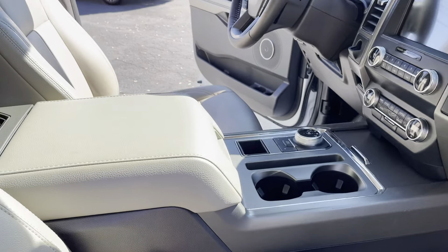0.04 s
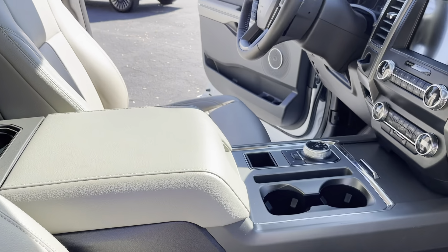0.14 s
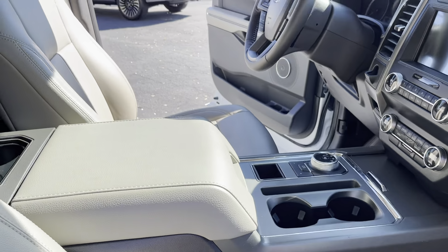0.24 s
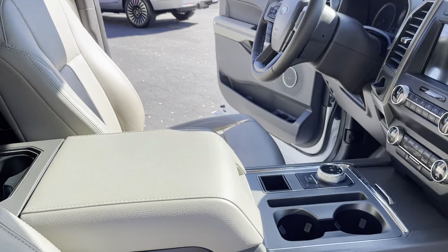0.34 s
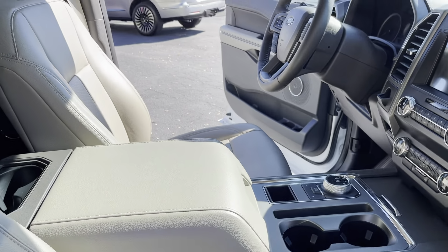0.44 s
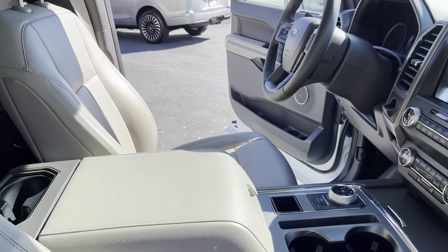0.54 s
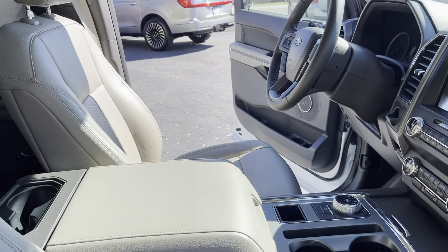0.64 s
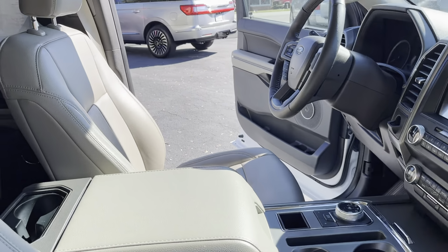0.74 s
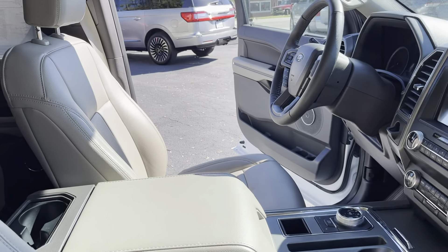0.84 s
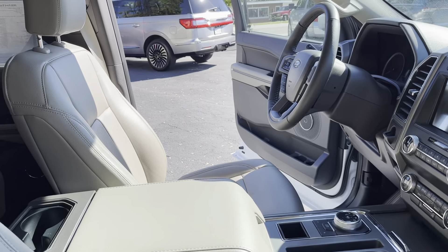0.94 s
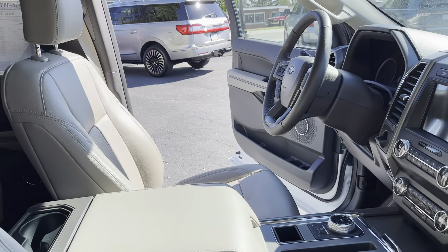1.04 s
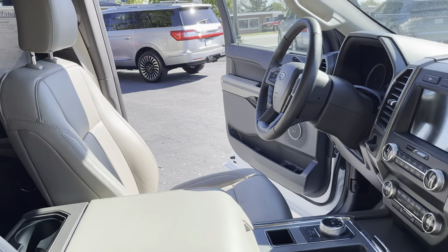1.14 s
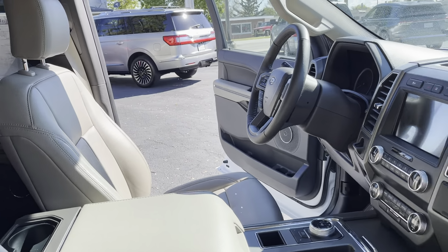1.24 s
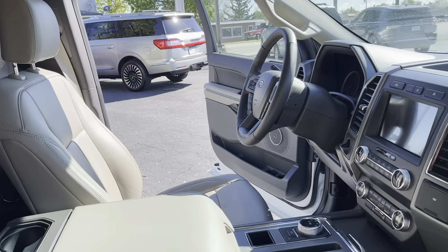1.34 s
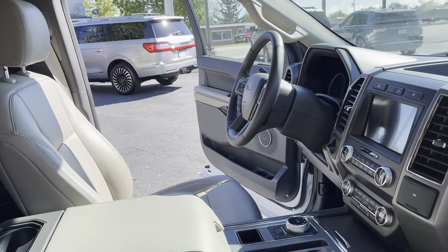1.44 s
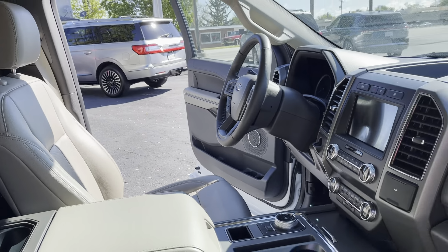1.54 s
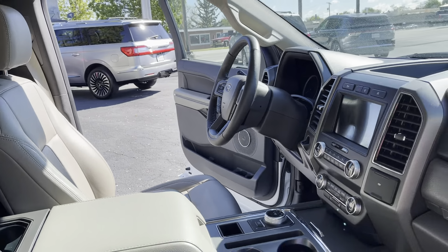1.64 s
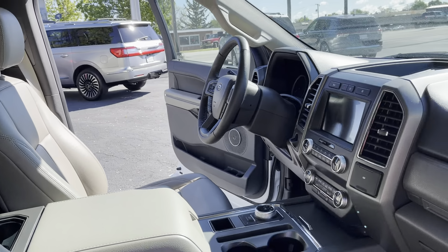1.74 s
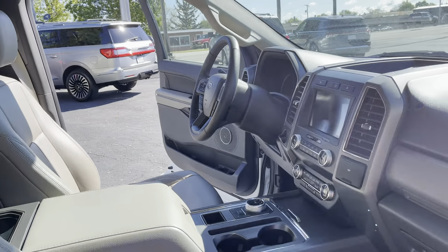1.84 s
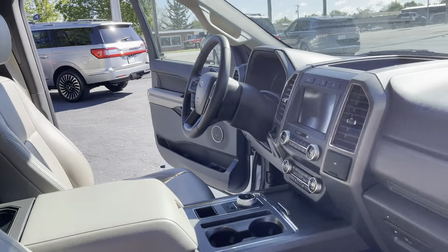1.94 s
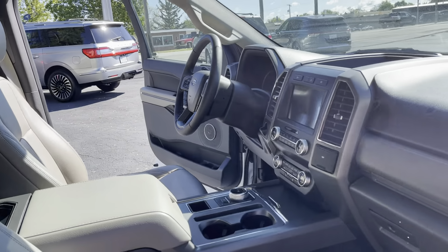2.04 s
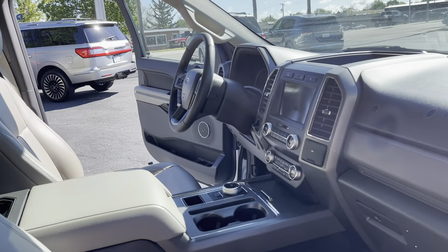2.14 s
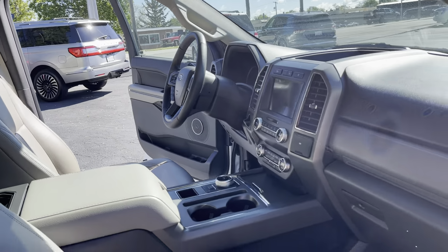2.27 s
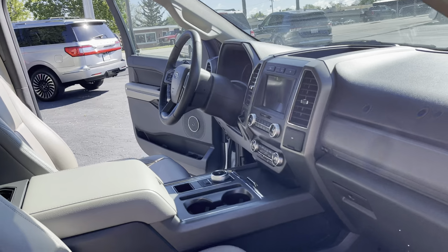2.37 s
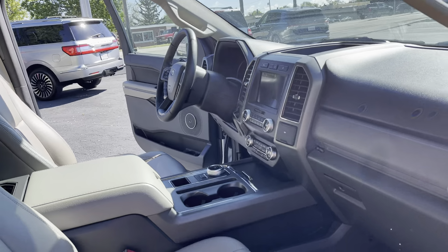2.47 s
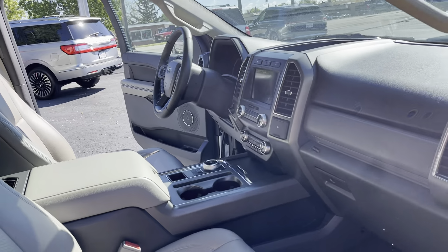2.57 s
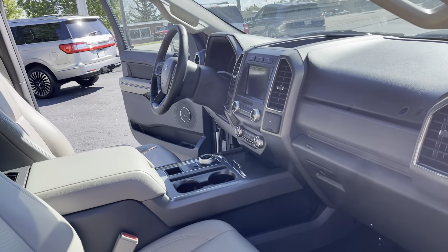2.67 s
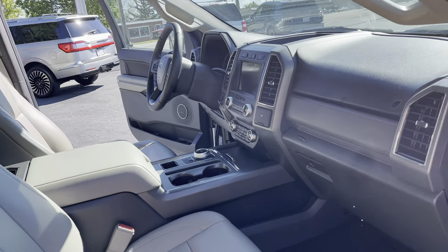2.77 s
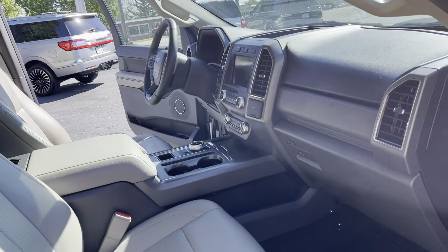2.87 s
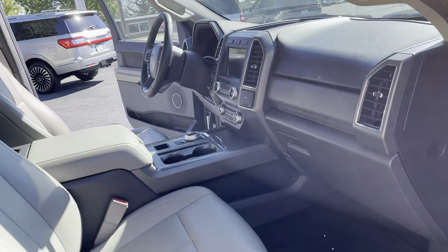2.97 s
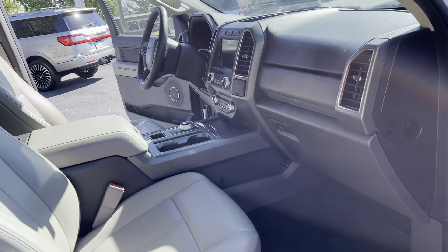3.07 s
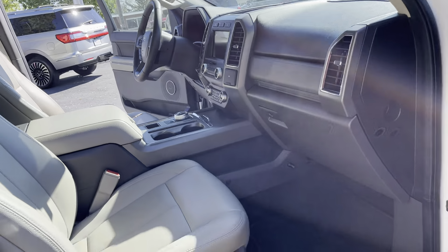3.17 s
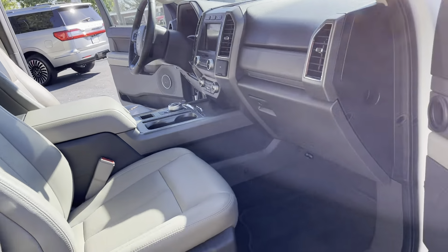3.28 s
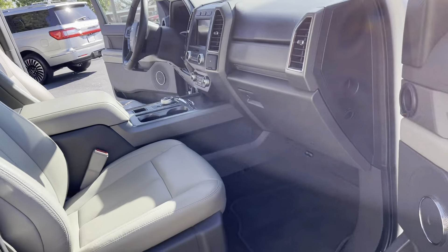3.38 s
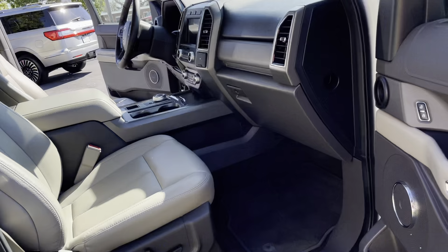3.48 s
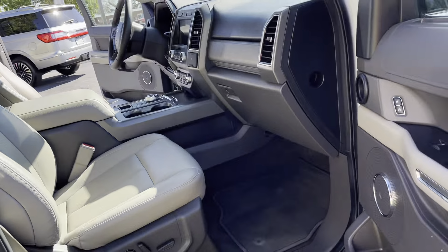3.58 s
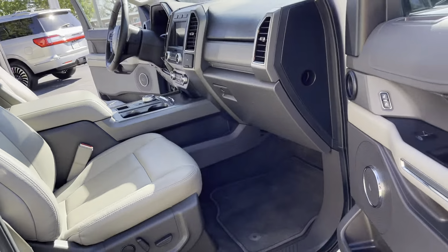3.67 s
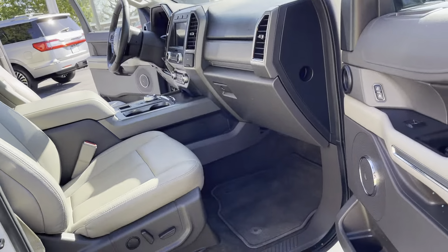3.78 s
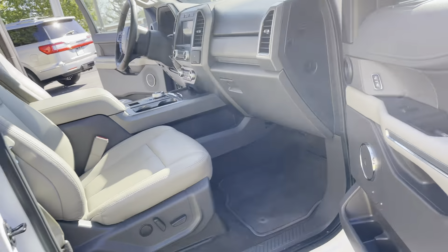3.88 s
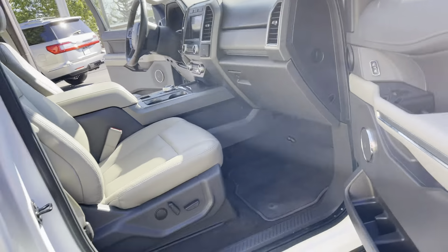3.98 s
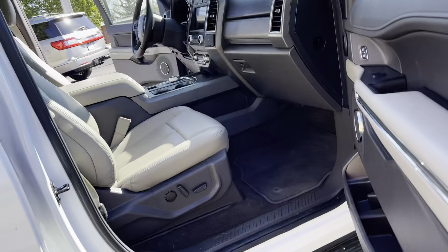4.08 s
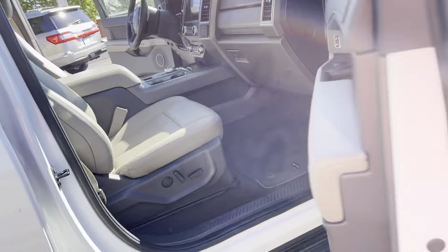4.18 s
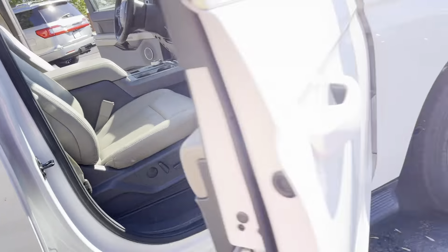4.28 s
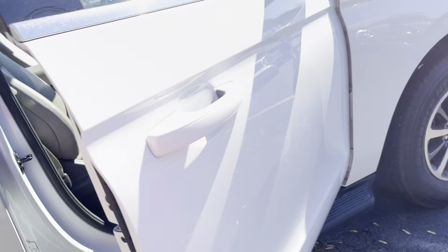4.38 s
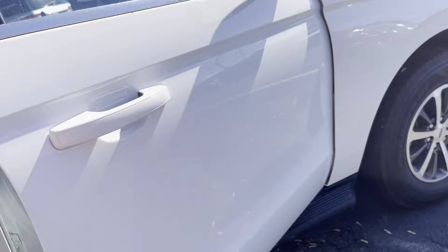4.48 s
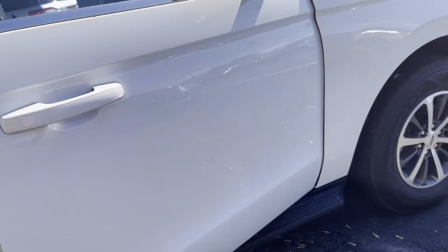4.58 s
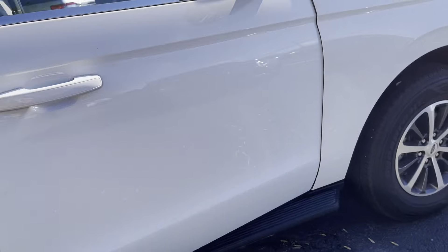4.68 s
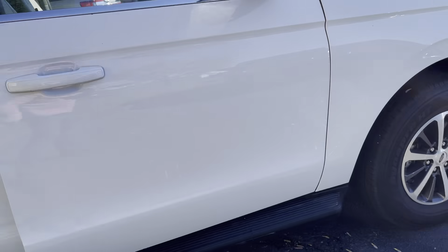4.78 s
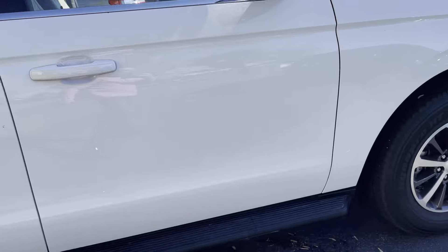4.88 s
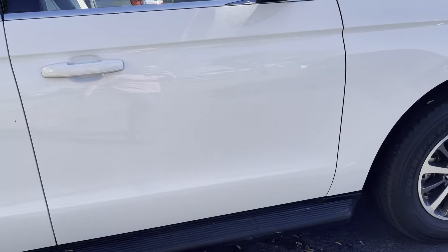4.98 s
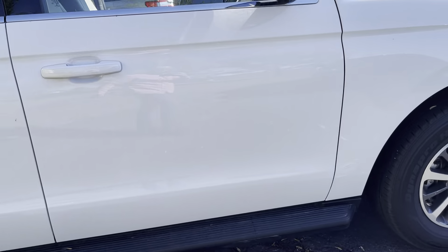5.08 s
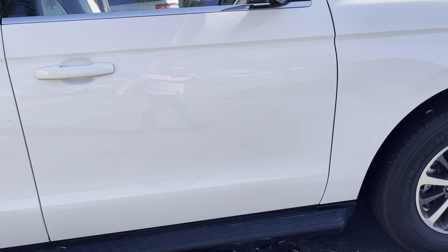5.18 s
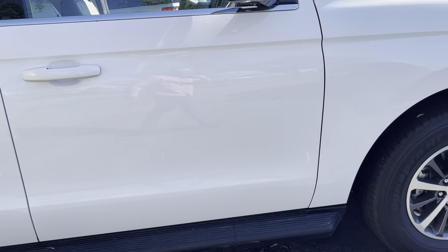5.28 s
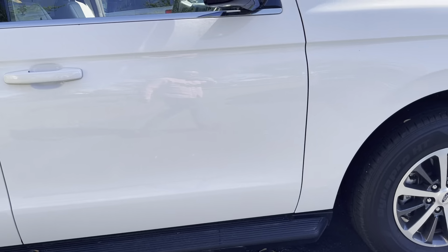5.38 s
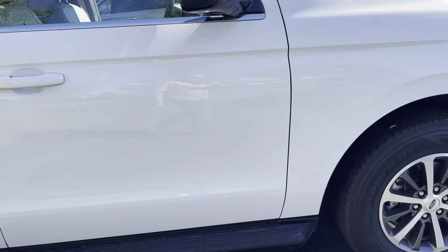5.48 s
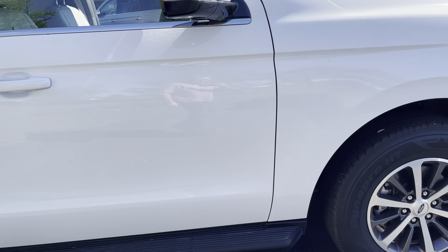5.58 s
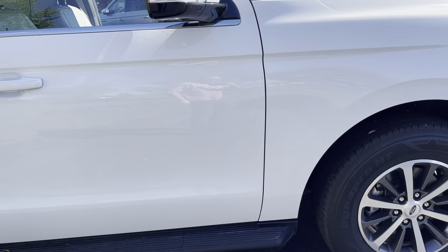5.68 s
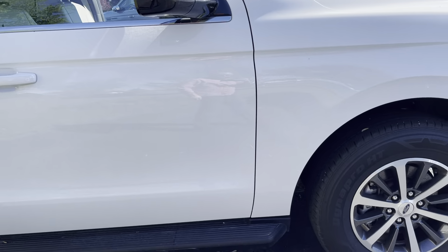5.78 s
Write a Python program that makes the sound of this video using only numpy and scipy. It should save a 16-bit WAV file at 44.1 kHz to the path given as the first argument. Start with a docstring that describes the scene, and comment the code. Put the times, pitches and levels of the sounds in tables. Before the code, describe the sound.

A hand-held stereo microphone moves from a car cabin into an open lot. Distant traffic, faint chirps and a fading fuzzy resonance come first; wind thumps, light ticks and rustling follow. Near the end one loud door slam lands with a latch scrape, panel thump, brief trim rattle and sinking boom, then stronger wind rumble.

```python
"""Far traffic hums first, beneath wind, faint bird notes and a fuzzy cabin resonance that dies away; then a car
door slams in an open lot, close to a hand-held stereo microphone. Small things tick and cloth rustles as the
holder steps back from the cabin. The door is decaying panel modes, rattling noise, a sinking boom and shoved
air; the wind is fluctuating low noise with short eddies; the bird is gliding sines; traffic, cloth, hiss and
the cabin resonance are shaped noise."""
import sys
import numpy as np
from scipy import signal
from scipy.fft import rfft, irfft, next_fast_len
from scipy.io import wavfile

SR = 44100
rng = np.random.default_rng(int(sys.argv[2]) if len(sys.argv) > 2 else 0)


def persist_wave(psi):
    """Save psi, clipped to +-1, as 16-bit WAV."""
    counts = np.round(np.clip(psi, -1, 1) * 32767).astype(np.int16)
    wavfile.write(sys.argv[1], SR, np.atleast_2d(counts).T)


def gain_from_db(level_db):
    """Convert decibel levels to linear amplitude factors (20 dB per decade)."""
    decades = np.asarray(level_db, float) / 20
    return 10 ** decades


N = 256662
T = np.arange(N) / SR
HALVES = np.array([[.5], [-.5]])  # shares a left-right difference between the channels

# Interchannel correlation of traffic and the cabin tone: f/Hz, correlation (limited to +-1)
FAR_CORRELATION = [(60, 0.92), (150, 0.93), (350, 0.69), (860, -0.36), (2080, 0.19), (5030, 0.42),
                   (12200, -1.06)]
# Door sound, left over right: f/Hz, level difference/dB
DOOR_BALANCE = [(60, 3), (150, -1), (350, 3), (860, 4), (2080, 5.5), (5030, 2), (12200, 1)]
# Blows of the slam, the strike and its rebounds: t/s, nominal ring level/dB, contact time/s, rattle level/dB
BLOWS = [(4.9143, -13.5, 0.00023, -11.5), (4.926, -22.5, .001, -25.5), (4.943, -15, 0.00095, -22.5),
         (4.973, -20, 0.0015, -47)]


def read(points, hz):
    """Spectral interpolation: a table read linearly on a logarithmic frequency axis."""
    f, value = np.transpose(points)
    return np.interp(np.log(hz + 1), np.log(f + 1), value)


def add(mix, start_s, sound):
    """Superposition: a two-channel sound is summed into the mix from start_s on."""
    part = mix[:, round(start_s * SR):][:, :sound.shape[1]]
    part += sound[:, :part.shape[1]]


def noise(spectrum, correlation, size=N, tilt_db=0, left=((1, 0), (2, 0))):
    """Spectral shaping: Gaussian noise of rms 1; tilt_db is the slope per octave well above 2 kHz, nearly flat below."""
    fast = next_fast_len(size)
    hz = np.fft.rfftfreq(fast, 1 / SR)
    common, independent = rfft(rng.standard_normal((2, fast)))
    c = np.clip(read(correlation, hz), -1, 1)
    channels = np.array([common, c * common + np.sqrt(1 - c ** 2) * independent])
    colour_db = read(spectrum, hz) + tilt_db * np.log2(1 + hz / 2000)
    x = irfft(channels * gain_from_db(colour_db + HALVES * read(left, hz)), fast)[:, :size]
    return x / np.sqrt(np.mean(x ** 2))


def lumps(cutoff_hz):
    """Slow random modulation: low-passed Gaussian noise scaled to unit deviation."""
    lowpass = signal.butter(2, cutoff_hz, fs=SR, output="sos")
    x = signal.sosfilt(lowpass, rng.standard_normal(N))
    return x / x.std()


def humps(rows):
    """Energy addition: the summed power of Gaussian swells, each half width reaching 1/e of peak power."""
    return sum(gain_from_db(db) ** 2 * np.exp(-((T - middle) / half) ** 2) for middle, db, half in rows)


def latch():
    """Friction: the catch scrapes over the striker as a short burst of coloured noise."""
    # Scrape: t/s, level/dB, length/s
    scrapes = [(4.9015, -22, .009)]
    # Colour of the scrape: f/Hz, power density/dB
    scrape_colour = [(250, -45), (430, -7), (790, -4), (1050, -12), (1400, 0), (1900, -13), (3500, -28),
                     (5200, -21), (6500, -34), (9000, -46), (12000, -80)]
    start, db, length = scrapes[0]
    t, out = np.arange(4096) / SR, np.zeros((2, N))
    shape = np.minimum(t / .002, 1) * np.exp(-np.maximum(t - length, 0) / .002)
    correlation = [(500, 1.0), (1500, 0.091), (5000, 0.98)]
    scrape = noise(scrape_colour, correlation, size=4096, left=DOOR_BALANCE)
    add(out, start, gain_from_db(db) * shape * scrape)
    return out


def panel_ring():
    """Modal vibration: each blow excites damped panel modes through a finite contact pulse."""
    # Panel modes: f/Hz, level/dB, t60/s
    panel_modes = [(151, 1.5, 0.43), (249, 3.5, 0.2), (296, 6, 0.075), (420, 0, 0.15), (454, 0, .16),
                   (652, 5.5, 0.07), (721, -4, 0.21), (822, -10, 0.1), (897, -11, 0.11), (990, -24, 0.15),
                   (1195, -35, 0.17), (1300, -19, 0.15), (1440, -28, 0.15), (43, 9.5, 0.19),
                   (62.9, -20, .5), (132, -7, 0.3), (207, 4, 0.18), (501, -2, 0.12), (570, -9, 0.1)]
    t, out = np.arange(32768) / SR, np.zeros((2, N))
    channel_delay_s = 0.00019  # between the channels
    ring = np.zeros((2, len(t)))
    for hz, db, t60 in panel_modes:
        decay = gain_from_db(db + HALVES * read(DOOR_BALANCE, hz) - 60 * t / t60)
        build_up = 1 - np.exp(-t * hz / 0.8)  # low modes take longer to build up
        ring += decay * build_up * np.sin(2 * np.pi * hz * (t - HALVES * channel_delay_s))
    for start, ring_db, contact, _ in BLOWS:
        push = np.exp(-(t[:2048] / contact - 1.5) ** 2)  # a soft contact starves the high modes
        add(out, start, gain_from_db(ring_db) * signal.oaconvolve(ring, push[None] / push.sum(), axes=1))
    return out


def trim_rattle():
    """Frequency-dependent damping: each blow shakes the trim into noise whose bands decay separately."""
    # Rattle colour: f/Hz, power density/dB
    rattle_colour = [(320, -20), (550, -0.5), (859, -5.5), (1680, -20), (1960, -17), (3360, -22.5),
                     (3590, -24), (4790, -21.5), (6570, -24.5), (6830, -25), (8880, -17.5), (10000, -29.5),
                     (11700, -25.5), (12700, -40), (15300, -51), (16500, -66), (22000, -120)]
    # Rattle decay: f/Hz, t60/s
    rattle_decay = [(300, 0.26), (1000, 0.1), (3000, 0.32), (8000, 0.085), (14000, 0.27)]
    # Interchannel likeness of the rattle: f/Hz, correlation
    rattle_correlation = [(60, 0.95), (150, 0.7), (350, 0.85), (860, 0.88), (2080, 0.15), (5030, 0.76),
                          (8000, .1), (12200, 0.66)]
    chatter_s, rise_s = 0.014, 0.00027
    first_tilt_db, dulling_db = -1.0, -76  # treble slope, dB per octave; its change per second
    out = np.zeros((2, N))
    for start, _, _, rattle_db in BLOWS:
        tilt_db = first_tilt_db + dulling_db * (start - BLOWS[0][0])
        raw = noise(rattle_colour, rattle_correlation, size=16384, tilt_db=tilt_db, left=DOOR_BALANCE)
        hz, when, bands = signal.stft(raw, SR, nperseg=128)
        settle = gain_from_db(-12) + np.exp(-np.maximum(when - chatter_s, 0) / .001)
        bands *= gain_from_db(-60 * when / read(rattle_decay, hz)[:, None])
        bands *= np.where(hz[:, None] > 1500, settle, 1)  # the bright chatter drops early
        shake = signal.istft(bands, SR, nperseg=128)[1]
        rise = np.minimum(np.arange(shake.shape[1]) / SR / rise_s, 1)
        add(out, start, gain_from_db(rattle_db) * shake * rise)
    return out


def cabin_boom():
    """Air compression: squeezed cabin air sounds a low tone whose pitch sinks as the pressure eases."""
    # Boom: t/s, final f/Hz, extra f at first/Hz, its time constant/s, hold/s, t60/s
    cabin_air = (4.9266, 62, 52, .012, .046, .17)
    start, hz, extra_hz, fading, hold, t60 = cabin_air
    t, out = np.arange(32768) / SR, np.zeros((2, N))
    turns = hz * t + extra_hz * fading * (1 - np.exp(-t / fading))
    decay = gain_from_db(-11 - 60 * np.maximum(t - hold, 0) / t60)
    boom = decay * np.sin(2 * np.pi * turns) * (1 + 2.1 * np.exp(-t / 0.008))  # stronger onset
    add(out, start, np.array([boom, boom]))
    return out


def door():
    """Superposition: latch friction, panel modes, trim rattle and cabin-air boom add in the slam."""
    return latch() + panel_ring() + trim_rattle() + cabin_boom()


def wind_and_shoved_air():
    """Turbulent pressure: wind, and air shoved by the slam, give low rumble, faster flutter and passing eddies."""
    # Wind on the ports, and near 5.0 s the low rumble of air shoved by the slam:
    # t/s, nominal rumble level/dB, flutter over rumble/dB
    flow_course = [(0, -46, -10), (.3, -65, 1), (.55, -47.5, -7), (.95, -63, -7.5), (1.3, -50.5, -7.5),
                   (1.7, -60.5, -4), (2.1, -54, -4), (2.25, -42, -26.5), (2.55, -40.5, -18),
                   (2.8, -40, -4.5), (3.15, -44, -11), (3.5, -50, -9), (3.85, -53.5, -11.5),
                   (4.2, -45.5, -9), (4.5, -43.5, -5), (4.88, -46.5, -6), (5.0, -30.5, -5),
                   (5.15, -35.5, -17.5), (5.4, -37.5, -21), (5.6, -35, -10), (5.77, -32, -2),
                   (5.82, -35, -15)]
    # Gusts that thump the ports: middle t/s, nominal level/dB, half width/s
    gust_rows = [(.05, -37.5, 0.057), (.365, -42.5, 0.014), (.47, -46, .02), (1.01, -49, 0.048),
                 (1.34, -43, .03), (1.45, -42.5, 0.022), (1.9, -49, 0.03), (2.71, -34.5, 0.012),
                 (3.41, -34.5, .025), (3.51, -41.5, 0.024), (3.96, -50.5, 0.023), (4.07, -41.5, 0.017),
                 (4.52, -33.5, 0.021), (4.59, -41, 0.014), (5.34, -32.5, .03), (5.5, -35, 0.054),
                 (5.61, -28.5, 0.018)]
    # Rumble colour: f/Hz, power density/dB
    rumble_colour = [(12, -55), (20, -32), (41, -0.5), (66, 4.5), (107, -0.5), (140, -7), (252, -37),
                     (400, -50), (520, -33.5), (880, -120)]
    # Flutter colour: f/Hz, power density/dB
    flutter_colour = [(90, -31), (150, 3.5), (260, -4), (420, -10.5), (700, -26.5), (1000, -73)]
    # Eddies that pop on a port: t/s, nominal peak level/dB, nominal f/Hz, duration in periods of f
    eddies = [(0.507, -36, 224, 3.2), (0.567, -38.5, 340, 2.3), (1.004, -39, 155, 3.3),
              (1.312, -38.5, 163, 2.1), (2.681, -31, 178, 3.1), (2.721, -29.5, 183, 4.1),
              (2.771, -23, 151, 2.6), (3.005, -32, 199, 5.9), (3.052, -31, 172, 2),
              (3.355, -24.5, 374, 2.9), (3.397, -39, 151, 3.5), (4.427, -41, 230, 2.6),
              (4.464, -27, 149, 1.7), (4.512, -24, 225, 2.9), (4.617, -33.5, 227, 5.3),
              (4.751, -34, 215, 2.5), (5.471, -28, 190, 3.4), (5.508, -31, 160, 4.8),
              (5.537, -23, 165, 2.1), (5.611, -19.5, 201, 2.85), (5.654, -21, 275, 4.9),
              (5.691, -30.5, 423, 9.7), (5.702, -32, 151, 3.4), (5.718, -20.5, 272, 2.6),
              (5.752, -17.5, 287, 3.3), (5.766, -26, 175, 4.8)]
    when, rumble_db, flutter_db = np.transpose(flow_course)
    steady, gusts = gain_from_db(np.interp(T, when, rumble_db)) ** 2, humps(gust_rows)
    gust_flutter = gusts * gain_from_db(-15) ** 2
    flutter = steady * gain_from_db(np.interp(T, when, flutter_db)) ** 2 + gust_flutter
    out = noise(rumble_colour, [(40, 0.86), (300, 0.87)]) * np.sqrt(steady + gusts) * gain_from_db(2.25 * lumps(16.8))
    out += noise(flutter_colour, [(100, 0.9), (600, 0.54)]) * np.sqrt(flutter) * gain_from_db(5.18 * lumps(32.0))
    for start, db, hz, cycles in eddies:
        phase, side = rng.random(2)
        u = np.arange(0, 1, hz / cycles / SR)
        turns = cycles * u * (1.25 - 0.34 * u) + phase  # pitch sinks as the eddy passes
        swell = (u * np.exp(1 - u / 0.24) / 0.23) ** 2.23 * (1 - u ** 4)
        add(out, start, gain_from_db(db + HALVES * 3 * (side - .5)) * np.sin(2 * np.pi * turns) * swell)
    return out


def impacts(rows, t60, rise, snap):
    """Impulsive excitation: dull and bright noise bands share a rise and a two-stage decay."""
    # Colour of the bright part: f/Hz, power density/dB
    bright_colour = [(2350, -20), (4000, -12), (4640, -20), (4870, -36), (5740, -9.5), (6320, 3.5),
                     (7030, -4), (8570, 4.5), (10100, -4.5), (10400, -5), (11100, 0.5), (12700, -28),
                     (15500, -33), (16500, -57), (22000, -120)]
    out, t = np.zeros((2, N)), np.arange(6144) / SR
    since = np.maximum(t - rise, 0)
    fall = gain_from_db(-60 * since / t60) + gain_from_db(-21 - 60 * since / 0.46)  # the cabin and the lot answer a little
    shape = fall * (1 + snap * np.exp(-t / 0.0013)) * np.minimum(t / rise, 1)
    for start, dull_db, bright_db, hz in rows:
        dull_colour = [(hz / 3, -40), (hz / 1.77, -12), (hz / 1.29, -3), (hz, 0),
                       (hz * 1.25, -5), (hz * 2.2, -17), (hz * 4, -40), (hz * 12, -90)]
        dull = noise(dull_colour, [(1000, 0.91), (5000, 0.15)], size=6144)
        bright = noise(bright_colour, [(5000, 0.63), (12000, 0.37)], size=6144)
        add(out, start, (gain_from_db(dull_db) * dull + gain_from_db(bright_db) * bright) * shape)
    return out


def ticks():
    """Impact: small ticks rise quickly, with an added snap, and die fast."""
    # Ticks: t/s, nominal dull level/dB, nominal bright level/dB, dull f/Hz
    tick_rows = [(0.7452, -62, -55, 1470), (0.8174, -61, -55, 1450), (0.8294, -63, -49.5, 1370),
                 (1.2164, -58.5, -58, 1520), (2.1525, -53.5, -50, 2835), (2.7823, -45, -43.5, 2850),
                 (2.8878, -49, -62.5, 1380), (3.0377, -66, -54, 1300), (3.0436, -62, -55, 1480),
                 (3.0681, -50, -47, 2420), (3.163, -43, -60, 700), (3.5613, -50, -76, 1330),
                 (3.7764, -66, -64.5, 1320), (3.923, -55, -80, 3450), (3.9374, -59.5, -50, 2160),
                 (4.0814, -62, -56, 1480), (4.1101, -30, -48, 1700), (4.1525, -48, -64, 1430),
                 (4.433, -51, -65, 726), (4.505, -59, -65, 853), (5.3344, -60.5, -63, 1300),
                 (5.3624, -68, -63, 1350), (5.3974, -61, -58.5, 1400), (5.5984, -62, -75, 4300),
                 (5.7294, -72, -63, 1530)]
    return impacts(tick_rows, t60=0.051, rise=0.00086, snap=1.1)


def scuffs():
    """Friction: scuffs rise more slowly and last longer than ticks, without a snap."""
    # Scuffs: t/s, nominal dull level/dB, nominal bright level/dB, dull f/Hz
    scuff_rows = [(3.258, -56.5, -57, 2700), (3.585, -44, -89, 330), (3.57, -51, -84, 1064),
                  (4.19, -54, -56, 2480), (4.7444, -59, -68, 2100)]
    return impacts(scuff_rows, t60=.19, rise=.018, snap=0)


def bird():
    """Frequency modulation: gliding whistles waver with distance and are smeared by dense far echoes."""
    # Notes: t/s, length/s, nominal start f/Hz, nominal end f/Hz, nominal level/dB
    bird_notes = [(.06, 0.056, 2800, 3000, -74), (0.128, .09, 3580, 4680, -74),
                  (.29, 0.08, 3400, 4650, -70), (0.455, 0.076, 3300, 5400, -71),
                  (.52, .05, 5400, 5600, -74), (.56, .08, 5480, 4300, -72.5),
                  (0.645, 0.056, 3300, 4470, -71), (0.687, .05, 3750, 3810, -71),
                  (.83, .06, 4600, 3530, -74), (0.858, .06, 3000, 2580, -68), (.91, .12, 2580, 2480, -67),
                  (0.918, 0.063, 3840, 3320, -70), (1.135, 0.037, 7250, 6400, -72),
                  (1.218, 0.07, 4560, 3300, -69.5), (1.24, 0.069, 2550, 2600, -64),
                  (1.345, 0.055, 2400, 2420, -66), (1.402, 0.12, 3005, 3110, -63.5),
                  (1.448, .05, 7350, 6500, -72), (1.456, 0.035, 4200, 3580, -72),
                  (1.612, 0.086, 4930, 4560, -70), (1.74, 0.086, 3500, 4020, -71),
                  (1.875, 0.053, 3750, 3580, -69), (1.9, 0.18, 2635, 2564, -61),
                  (1.913, 0.098, 2344, 2410, -62.5), (2.027, 0.04, 3670, 3000, -63.5),
                  (2.27, .07, 5200, 6300, -77), (2.342, .2, 4280, 5480, -77), (2.54, .08, 4200, 4150, -83),
                  (5.05, 0.067, 4330, 3150, -66), (5.126, 0.025, 3350, 4350, -69),
                  (5.652, .045, 5800, 4300, -69), (5.69, .03, 4350, 4450, -68),
                  (5.723, 0.038, 5200, 4950, -73), (5.762, .018, 4700, 3900, -65),
                  (5.779, .043, 3970, 3900, -68)]
    glide_ease = .7  # below 1: a glide moves fast at first, then settles
    direct, waver, flicker = np.zeros((1, N)), lumps(90), lumps(110)
    for start, length, start_hz, end_hz, db in bird_notes:
        u = np.arange(0, 1, 1 / length / SR)
        at = np.minimum(round(start * SR) + np.arange(len(u)), N - 1)
        hz = (start_hz + (end_hz - start_hz) * u ** glide_ease) * (1 + .016 * waver[at])
        whistle = np.sin(2 * np.pi * np.cumsum(hz) / SR) * np.sin(np.pi * u) ** .5
        add(direct, start, gain_from_db(db + 2.5 * flicker[at]) * whistle[None])
    t = np.arange(8000) / SR
    echoes = rng.standard_normal((2, 8000)) * gain_from_db(-27 - 60 * t / .15)
    return gain_from_db(-1) * direct + signal.oaconvolve(direct, echoes, axes=1)[:, :N]


def cabin_tone():
    """Resonance: a narrow band of noise gives a fuzzy 750 Hz cabin resonance dying away."""
    # Cabin resonance: t/s, initial level/dB, f/Hz, t60/s
    resonance = [(0, -49, 750, 0.98)]
    start, db, hz, t60 = resonance[0]
    colour = [(hz - 120, -80), (hz - 25, -3), (hz + 25, -3), (hz + 120, -80)]
    return gain_from_db(db - 60 * (T - start) / t60) * noise(colour, FAR_CORRELATION)


def cloth():
    """Friction: cloth rustle is noise broken into fine random grains, in strokes and a steady layer."""
    # Cloth strokes as the holder moves: middle t/s, nominal level/dB, half width/s
    stroke_rows = [(.78, -76, 0.14), (2.14, -75, 0.079), (2.8, -69.5, 0.042), (3.22, -60, .12),
                   (4.2, -65.5, 0.068), (4.47, -70, 0.043), (4.97, -68, 0.14), (5.36, -70, 0.086)]
    # Rustle colour: f/Hz, power density/dB
    rustle_colour = [(1760, -31), (3000, -2), (3770, 0), (6220, 1), (7230, 0), (8930, 4.5), (10300, -8.5),
                     (11400, -5), (12100, -18), (12700, -38), (16500, -61), (22000, -120)]
    steady = gain_from_db(-71.5) * np.interp(T, (2.54, 2.83), [0, 1])  # fades in for walking, times in s
    level = np.sqrt(humps(stroke_rows) + steady ** 2)
    grains = gain_from_db(0.5 * lumps(60) + 1.7 * lumps(7.2))
    return noise(rustle_colour, [(3000, 0.31), (12000, 0.089)]) * level * grains


def traffic():
    """Room resonance: far traffic is hollow inside the cabin, then crossfades to its open-air colour."""
    # Traffic heard from the cabin: f/Hz, power density/dB
    cabin_colour = [(24, -45), (40, 1.5), (71, -2), (143, -9), (191, -9), (325, -9), (456, -18.5),
                    (580, -6.5), (654, -13.5), (720, -5.5), (853, -10), (1840, -19), (5320, -42.5),
                    (8820, -71), (12700, -65), (16500, -77), (22000, -120)]
    # Hollow cabin resonances: f/Hz, -3 dB width/Hz, nominal level/dB
    cabin_resonances = [(598.6, 120, -26), (732, 230, -25), (1119, 370, -12), (1360, 170, -19)]
    # Traffic heard outside: f/Hz, power density/dB
    open_colour = [(120, -6.5), (200, -3), (343, -14.5), (394, -11), (607, -9), (874, -6), (1580, -16.5),
                   (2050, -18.5), (2900, -29.5), (8790, -53), (12700, -45), (16500, -66), (22000, -120)]
    # Slow swelling of the traffic: t/s, nominal level/dB
    swelling = [(0, -47.5), (.55, -49.5), (1.2, -52.5), (2.14, -50.5), (2.6, -50.5), (3.3, -47.5),
                (4.1, -47), (4.9, -47.5), (5.82, -48.5)]
    hollow = noise(cabin_colour, FAR_CORRELATION)
    for hz, width, db in cabin_resonances:
        colour = [(hz - 3 * width, -30), (hz - width / 2, -3), (hz, 0), (hz + width / 2, -3), (hz + 3 * width, -30)]
        hollow = hollow + gain_from_db(db) * noise(colour, FAR_CORRELATION) * gain_from_db(2.62 * lumps(3.9))
    outside = np.interp(T, (2.04, 3.7), [0, np.pi / 2])  # leaving the cabin, start and end in s
    open_air = gain_from_db(-6.5) * noise(open_colour, FAR_CORRELATION)
    hum = np.cos(outside) * hollow + np.sin(outside) * open_air
    return hum * gain_from_db(np.interp(T, *np.transpose(swelling)) + 0.83 * lumps(4.9))


def hiss():
    """Self-noise: the microphone adds steady, weakly correlated random noise."""
    # Self-noise colour: f/Hz, power density/dB
    hiss_colour = [(2000, -16), (5000, 1.5), (9000, -1), (12000, -4), (12800, -14), (13500, -60)]
    return gain_from_db(-81.5) * noise(hiss_colour, [(3000, .1), (12000, .1)])


def scene():
    """Superposition: the pressures of all sources add at the microphone, with its self-noise."""
    small = ticks() + scuffs()
    return door() + wind_and_shoved_air() + small + bird() + cabin_tone() + cloth() + traffic() + hiss()


def roll_off(x):
    """The treble ends steeply here."""
    return signal.sosfilt(signal.butter(12, 15800, fs=SR, output="sos"), x)


def record(dry):
    """Transducer response: the microphone cuts bass, has a narrow port notch and overloads softly."""
    bass_cut = signal.butter(2, 30, "high", fs=SR, output="sos")
    cut = signal.sosfilt(bass_cut, dry)
    notch_hz, notch_sharpness = 10350, 22  # sharpness is the quality factor Q
    cut = signal.lfilter(*signal.iirnotch(notch_hz, notch_sharpness, fs=SR), cut)
    finished = 1.3 * np.tanh(cut / 1.3)
    return roll_off(finished)


dry = scene()
out = record(dry)
persist_wave(out)
```